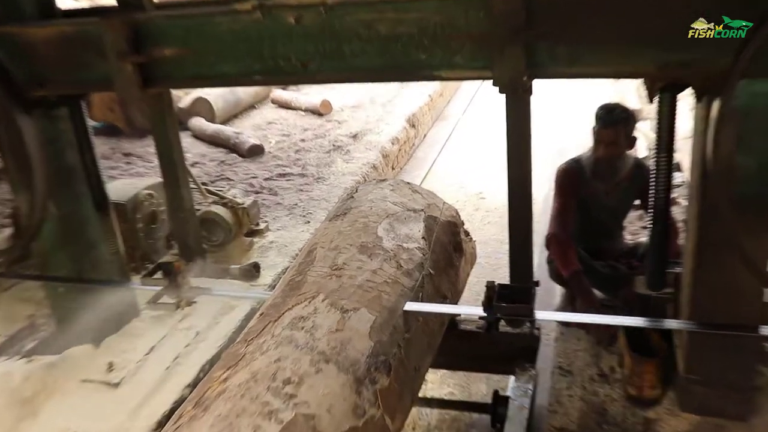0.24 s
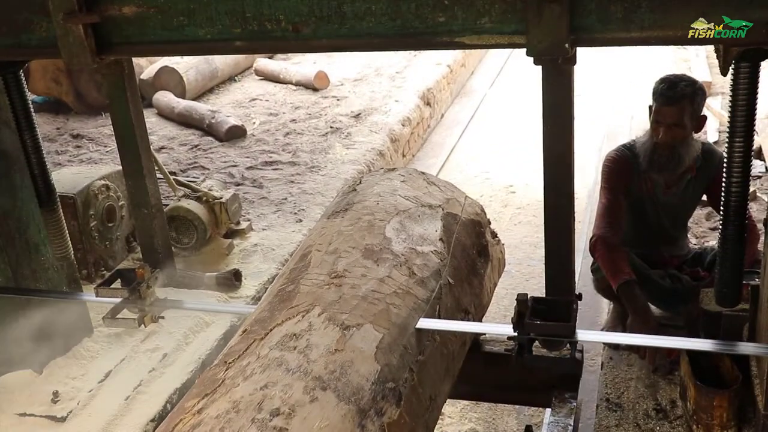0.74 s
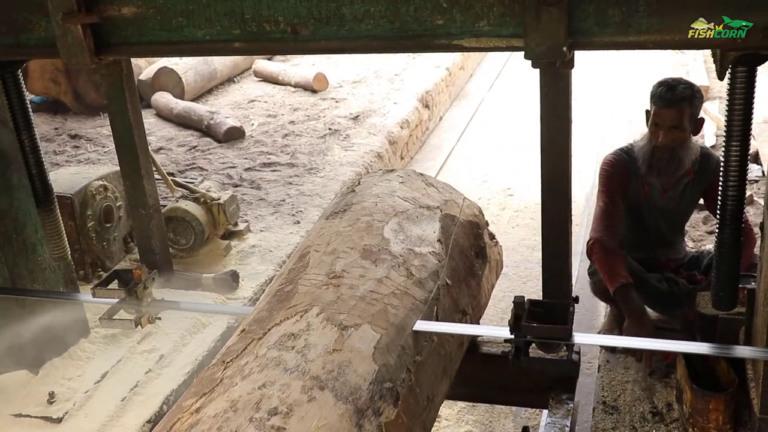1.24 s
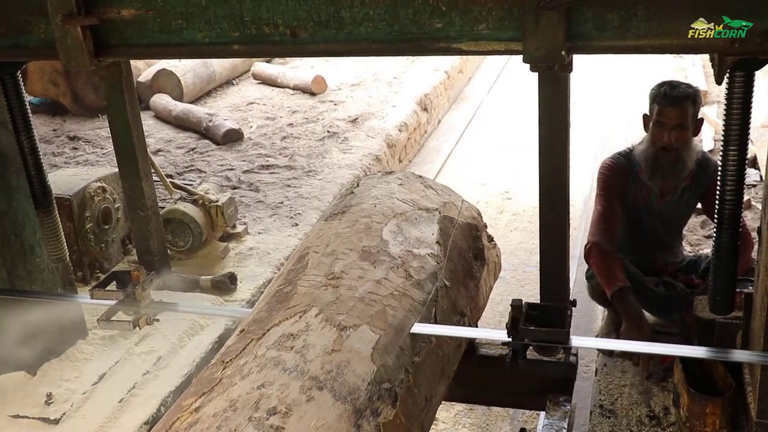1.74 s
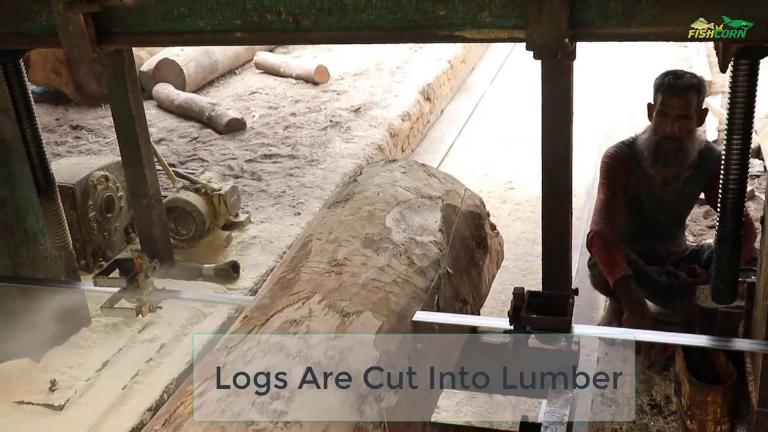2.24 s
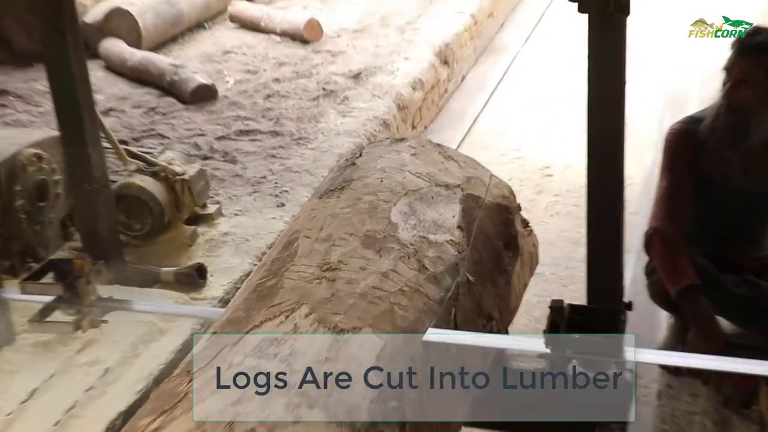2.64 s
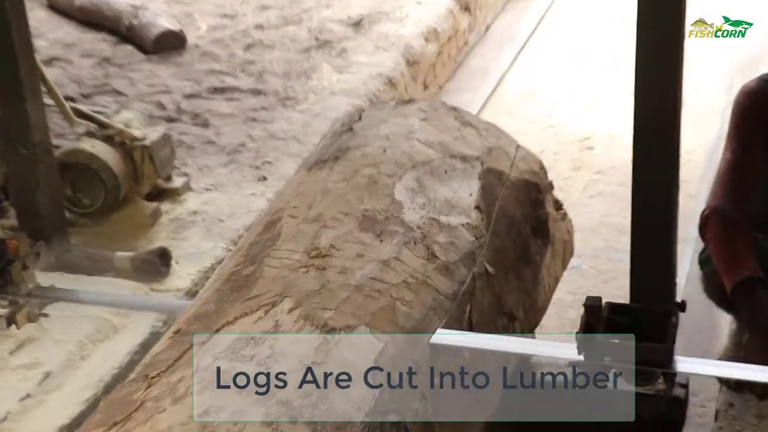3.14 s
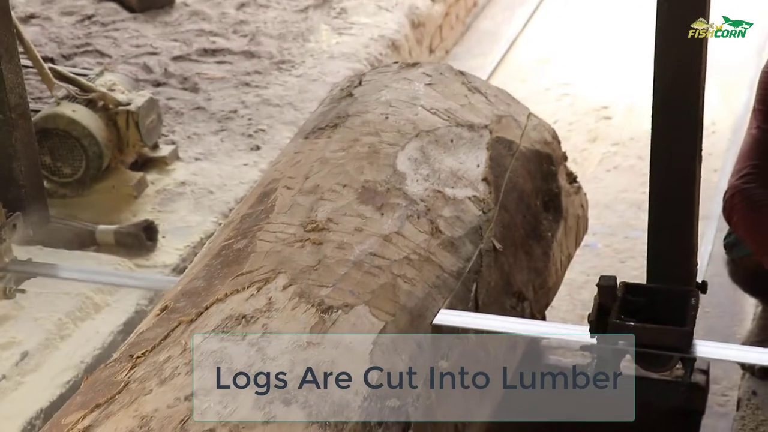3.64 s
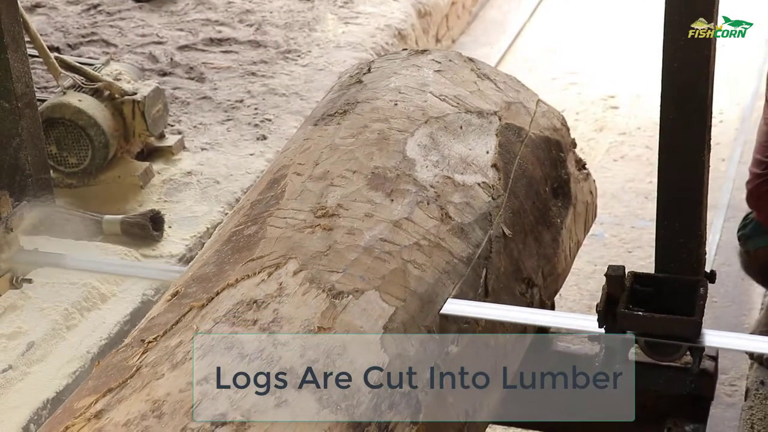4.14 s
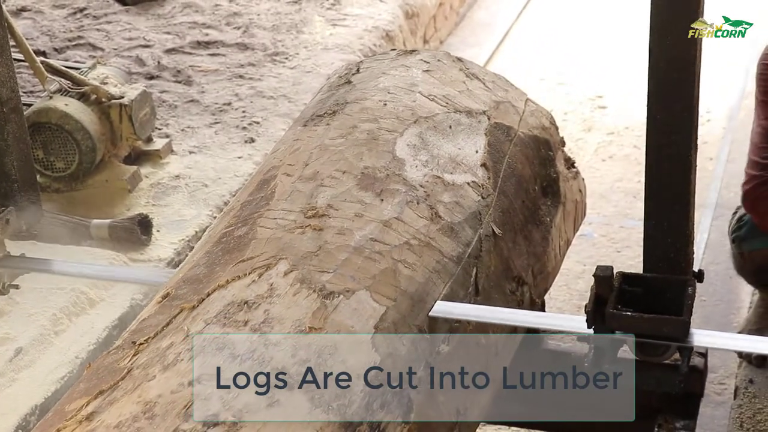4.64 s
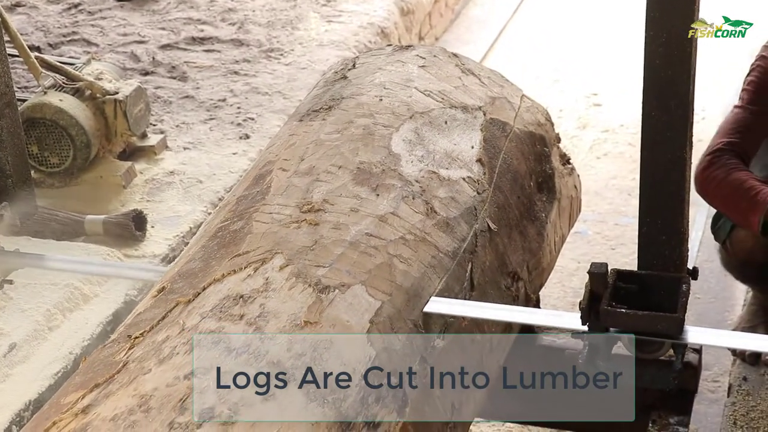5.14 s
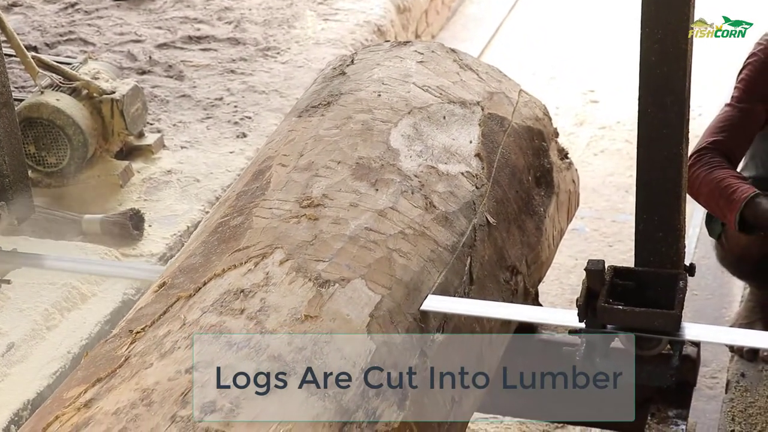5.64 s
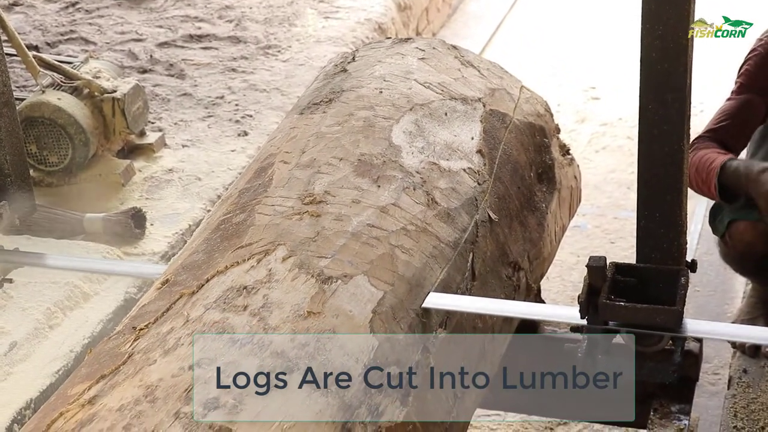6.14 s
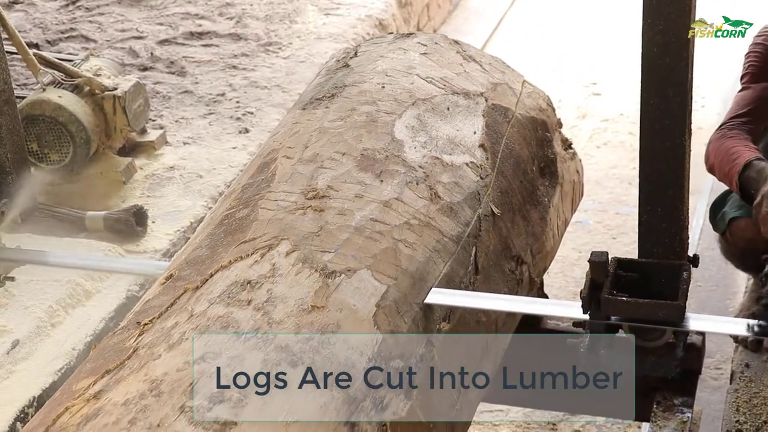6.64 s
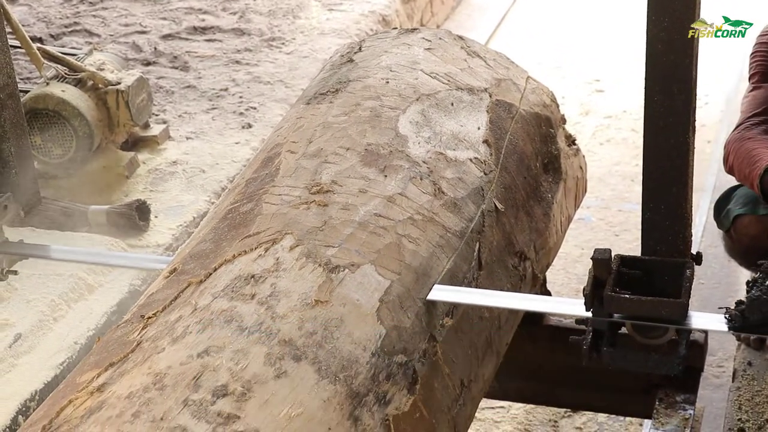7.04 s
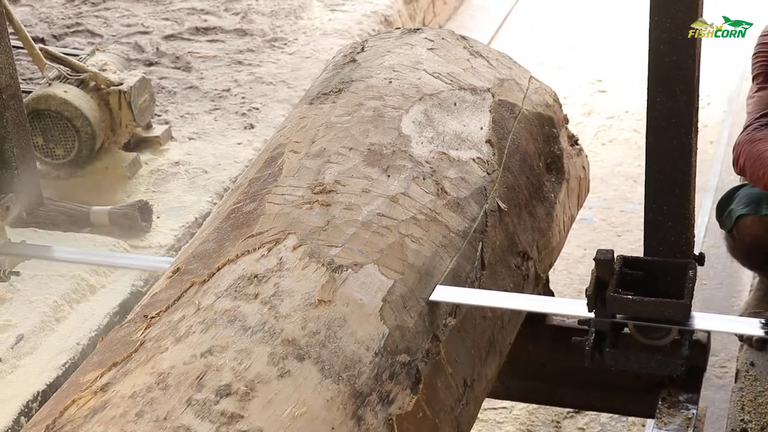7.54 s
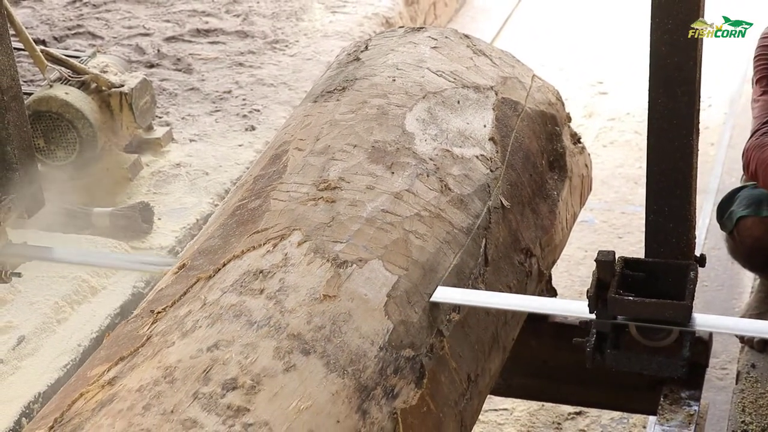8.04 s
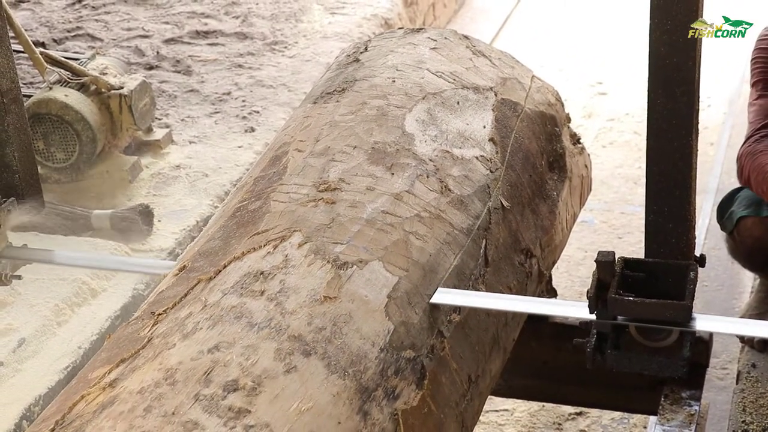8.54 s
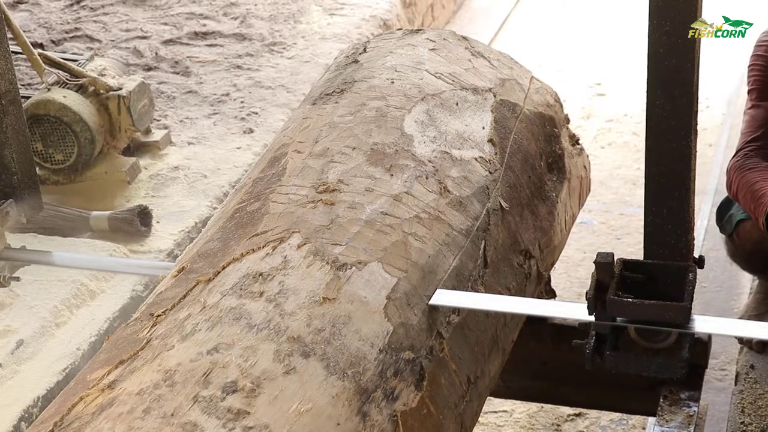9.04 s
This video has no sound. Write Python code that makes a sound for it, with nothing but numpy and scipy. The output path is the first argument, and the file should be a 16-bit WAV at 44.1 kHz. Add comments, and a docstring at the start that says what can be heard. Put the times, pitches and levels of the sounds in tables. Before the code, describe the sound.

Close to a large band saw in an open sawmill shed, the teeth rip through a thick log with a constant, bright, gritty hiss. It surges and flutters rapidly, with fine dust fizz, splinter ticks and brief high chirps from the pinched band. Far quieter underneath are log rumble, frame judder, a few soft thuds, motor hum and faint machine moans. The cut never stops.

```python
"""An open sawmill shed, where a horizontal band saw cuts steadily through a big log.
The teeth tear the fibres with a surging hiss of stroked noise, and splinters and dust spray as snaps and fizz.
The steel band rubs in the kerf, rings through narrow resonances and squeals in short falling chirps.
Underneath, filtered noise makes the log and carriage rumble and knock, and the frame judder.
A motor hums and other machines moan faintly, as wavering sines over a low wash of mill noise."""
import sys
import numpy as np
from scipy import signal
from scipy.fft import rfft, irfft
from scipy.io import wavfile

SR = 44100
rng = np.random.default_rng(int(sys.argv[2]) if len(sys.argv) > 2 else 0)


def unload_wav(signal):
    """Save mono or channel-first audio to the path in sys.argv[1] as 16-bit WAV at rate SR, clipped to [-1, 1]."""
    wavfile.write(
        sys.argv[1],
        SR,
        np.round(np.clip(np.atleast_2d(signal).T, -1, 1) * 32767).astype(np.int16),
    )


N = 410130
TIME = np.arange(N) / SR
HZ = np.fft.rfftfreq(N, 1 / SR)
LAP_S = .7604  # one lap of the band loop
USUAL_BITE_DB, USUAL_SHAKE_DB = -35, -57.5  # reference levels for a harder or lighter cut
EDGE_HZ = 15700  # upper limit of the whole sound

# Levels below are relative: each layer adds its own trim and unsteadiness.
# how hard the feed presses the teeth into the log, joined by lines: start_s, level_db
FEED_BITE = [(0.0, -34), (1.02, -35.5), (1.58, -36), (2.28, -35.5), (3.12, -36.9), (3.67, -36.5),
             (3.77, -34.1), (4.34, -34), (4.64, -36.5), (5.35, -32.9), (5.49, -34.5), (6.03, -36),
             (6.82, -33.5), (6.9, -38), (7.44, -36.5), (7.66, -33.5), (8.23, -36.5), (9.3, -37.1)]
# soft and hard spots in the wood: centre_s, half_length_s, bite_change_db
WOOD_SPOTS = [(.57, 0.033, -3), (.8, .045, 2), (1.34, 0.029, -3), (1.42, 0.016, 1), (1.8, .017, 3),
              (2.51, .02, -2), (2.67, .018, -2), (3.29, 0.011, -2.5), (4.8, .03, -2.9), (5.77, 0.032, 1.5),
              (6.2, 0.021, 3), (6.28, 0.058, -4.5), (6.56, .012, 2.5), (7.02, .015, 2), (7.14, 0.018, 1),
              (7.3, .03, 1), (9.22, .016, 2)]
# keen stretches of teeth, back on every lap of the band: centre_in_lap_s, half_length_s, extra_bite_db
KEEN_TEETH = [(0.079, 0.029, 3), (0.131, 0.009, 2.3), (0.197, 0.02, 2.2), (0.295, 0.036, 1.6),
              (0.448, 0.048, 2.5), (0.576, 0.016, 2), (0.656, 0.014, 3.5), (0.719, 0.038, 2.5)]
# how much the keen stretches stand out, joined by lines: start_s, share
KEEN_SHARE = [(0, 0.37), (1.5, 0.99), (6.8, 0.53), (7.6, 0.19)]
# the band binds in the kerf, rubbing and shaking the machine: start_s, rub_db, log_db, frame_db
BINDING = [(0.0, -38.2, -54, -54), (0.69, -40.5, -58.5, -54.0), (1.03, -40.5, -60.5, -60),
           (1.83, -39.5, -59.5, -61), (2.11, -41, -59, -58), (2.86, -38.0, -58, -54.5),
           (3.51, -38, -54, -52), (4.19, -41, -57.5, -59.7), (4.63, -40.5, -60.5, -66),
           (4.81, -41, -54, -54), (5.19, -38.5, -59.5, -57.5), (5.65, -43.8, -59.5, -65.5),
           (6.49, -38.9, -59, -61), (6.96, -42.5, -62.5, -63.5), (7.37, -38, -55, -56.0),
           (8.03, -38, -57.5, -56.9), (8.67, -37.1, -52.5, -51), (9.3, -37.5, -53, -51.5)]
# the kerf grabs the band for a moment: centre_s, half_length_s, extra_rub_db, extra_shake_db
KERF_GRABS = [(0.404, 0.021, 2.5, 1.5), (2.27, .06, 1.5, 1.5), (3.505, .04, 1, 4.5), (3.783, .04, 3, 3),
              (4.876, .03, 2, 0.5), (5.025, .03, 3, 0.5), (6.338, 0.031, 0, -1), (7.22, 0.051, 1.5, 2),
              (7.58, 0.032, 1, 3.5), (8.32, 0.036, -0.5, 3), (8.686, .03, 1, 4), (9.14, 0.029, 2, 1.5)]
# spectrum of the torn fibres: point_hz, density_db (per Hz)
TEAR_COLOUR = [(1900, -52), (2500, -8), (3700, -3), (4900, 1), (5250, 1.5), (5550, -2), (6300, 0),
               (7300, 1), (9000, 0.5), (10200, -2.5), (11200, -7.5), (12500, -5.5), (13700, -13),
               (16000, -19)]
# broad ringing of the teeth: pitch_hz, width_hz, level_db
TOOTH_MODES = [(6425, 290, -3), (6585, 350, -2), (6800, 280, -12.5)]
# spectrum of the band rubbing in the kerf: point_hz, density_db (per Hz)
RUB_COLOUR = [(1000, -52), (2000, -26), (2200, -19.5), (2380, 2.5), (2700, 0.5), (3100, -2), (3900, -0.5),
              (4900, -3.5), (5600, -14.5), (7000, -5.5), (10000, -28.5), (16000, -23)]
# clouds of fine dust blown out of the kerf: centre_s, half_length_s, extra_fizz_db
DUST_CLOUDS = [(.35, .1, 2), (4.2, 0.44, 2), (7.6, .1, 9), (7.98, 0.16, 10)]
# spectrum of the dust fizz: point_hz, density_db (per Hz)
SPRAY_COLOUR = [(6000, -19), (9500, -7), (12000, 0), (14000, -2), (16000, -4)]
# narrow modes of the steel band: pitch_hz, width_hz, level_db
BAND_MODES = [(2490, 48, 1), (3120, 14, -18), (3600, 18, -14), (4395, 28, 2), (4823, 49, 5),
              (4980, 30, 6.5), (5170, 44, 5), (6450, 39, -5), (9200, 55, -7)]
# spectrum of the log's rumble: point_hz, density_db (per Hz)
LOG_COLOUR = [(150, -39), (250, -12.5), (400, -13), (460, -6), (520, -10), (600, -0.5), (700, -1), (850, 6),
              (950, 0.5), (1050, -11), (1400, -15), (2500, -37)]
# narrow resonances of the log on its carriage: pitch_hz, width_hz, level_db
LOG_MODES = [(303.7, 8, -11.5), (452, 6.6, -4.5), (487, 9.3, -10), (556.3, 7, -2.5), (590.4, 36, -1.5),
             (855, 26, -0.5), (921.5, 16, -1)]
# spectrum of the juddering steel frame: point_hz, density_db (per Hz)
FRAME_COLOUR = [(1100, -27), (1420, -15), (1570, -1.5), (1720, 0.5), (1880, -1), (2030, -10.5), (2400, 0.5),
                (3500, -51)]
# narrow resonances of the steel frame: pitch_hz, width_hz, level_db
FRAME_MODES = [(1564, 40, -3.5), (1604, 25, -3), (1867, 12, -1.5)]
# spectrum of the mill wash in the shed: point_hz, density_db (per Hz)
SHED_COLOUR = [(20, -40), (45, -31), (80, -18), (110, -8), (150, -12), (240, -1.5), (450, 2), (800, -5.5),
               (1200, -0.5), (3000, -19)]
# faint sagging moans of machines across the shed: start_s, length_s, starting_pitch_hz, level_db
MOANS = [(0, 0.55, 788, -62.5), (0.496, 0.63, 466, -73.5), (2.447, 0.47, 464, -69.5),
         (3.295, 0.89, 310, -69.5), (4.248, 0.62, 374, -73), (4.543, 0.42, 608, -68),
         (5.404, 0.82, 371, -73), (5.802, 0.68, 606, -68), (6.886, 0.59, 584, -65), (6.99, 0.66, 470, -70),
         (8.098, 0.43, 924, -57.5), (8.108, 0.54, 464, -68), (8.75, 0.67, 310, -69)]
# dull knocks of the log on its carriage: full_level_s, level_db, pitch_factor, decay_s
KNOCKS = [(.71, -64, .8, 0.039), (2.6, -61, 1.14, 0.13), (3.15, -52.5, 1.24, 0.11),
          (3.25, -47, 1.02, 0.047), (3.75, -61, .85, 0.066), (5.22, -61, .95, 0.047),
          (7.39, -62, 0.83, 0.058), (7.91, -57, 1.23, 0.044), (8.64, -56, 1.5, 0.053),
          (8.74, -53, 1.17, 0.043), (8.91, -61.5, 1.18, 0.025), (9.22, -60, 0.84, 0.055)]
# spectrum of a knock before its pitch factor: point_hz, density_db (per Hz)
KNOCK_COLOUR = [(150, -31), (300, -17), (430, -6), (530, 3), (700, -8.5), (900, -16), (1300, -15),
                (2500, -46)]
# brief squeals of a pinched band: centre_s, pitch_hz (at the centre), level_db
SQUEALS = [(0.9, 6410, -37), (1.96, 6380, -37), (3.9, 6520, -37), (4.25, 6360, -38), (4.37, 6370, -38),
           (5.22, 6370, -39), (5.29, 6650, -35), (5.39, 6340, -36), (5.76, 6360, -38), (5.9, 6550, -36),
           (6.05, 6350, -39), (6.55, 6310, -37), (6.66, 6570, -38), (6.81, 6330, -36)]


def amp(db):
    """Decibels to gain."""
    return 10 ** (np.asarray(db) / 20)


def unit(x):
    """Scales to an rms of one."""
    return x / np.sqrt(np.mean(x ** 2) + 1e-20)


def curve(rows, column=1):
    """One column of a table, joined by straight lines in time."""
    rows = np.array(rows)
    return np.interp(TIME, rows[:, 0], rows[:, column])


def swells(rows, clock=TIME):
    """Smooth rises or dips in dB, one bell shape for each row."""
    out = np.zeros(N)
    for centre, half, db in rows:
        near = abs(clock - centre) < 4 * half
        out[near] += db * np.exp(-.5 * ((clock[near] - centre) / half) ** 2)
    return out


def noise():
    """White noise."""
    return rng.standard_normal(N)


def wander(low_hz, high_hz, step=32):
    """Random unsteadiness between two rates, the slower ones stronger, drawn every few samples."""
    clock = TIME[::step]
    hz = np.fft.rfftfreq(len(clock), step / SR)
    low_cut = (hz / low_hz) ** 2 / (1 + (hz / low_hz) ** 2)
    shape = low_cut / (1 + (hz / high_hz) ** 4) / np.sqrt(hz + 1)
    spectrum = rfft(rng.standard_normal(len(clock))) * shape
    return np.interp(TIME, clock, unit(irfft(spectrum, len(clock))))


def fading(hits, decay_s):
    """Each hit jumps up at once and dies away exponentially."""
    return signal.lfilter([1], [1, -np.exp(-1 / (decay_s * SR))], hits)


def colour(x, points, pitch=1):
    """Gives x a spectrum, optionally shifted in pitch, that falls away below its lowest point."""
    hz, db = np.transpose(points)
    skirt = np.minimum(HZ / (hz[0] * pitch), 1) ** 2
    gain = amp(np.interp(np.log(HZ + 1), np.log(hz * pitch), db))
    return unit(irfft(rfft(x) * skirt * gain, N))


def ring(x, modes):
    """Passes x through resonances, each carrying its own share of the power."""
    response = sum(amp(db) / np.sqrt(width) / (1 + 1j * (HZ - hz) / width) ** 2 for hz, width, db in modes)
    return unit(irfft(rfft(x) * response, N))


def effort(uneven_db=0.24, rub_share=.25):
    """Levels in dB of biting and rubbing: the feed, spots in the wood, the laps of the band and its grabs."""
    spots = swells(WOOD_SPOTS)
    lap_clock = TIME % LAP_S
    # the second reading carries a swell over from the end of one lap into the next
    laps = swells(KEEN_TEETH, lap_clock) + swells(KEEN_TEETH, lap_clock + LAP_S)
    bite_db = curve(FEED_BITE) + spots + curve(KEEN_SHARE) * laps + uneven_db * wander(10, 35)
    grabs = swells((s, half, rub_db) for s, half, rub_db, _ in KERF_GRABS)
    return bite_db, curve(BINDING) + rub_share * spots + grabs


def tooth_strokes(tooth_hz=238, slip=0.032, depth=0.27, stroke=0.2, uneven_db=4):
    """Each tooth takes a bite of its own size that dies away before the next; stroke is in tooth periods."""
    turns = np.cumsum(tooth_hz * (1 + slip * wander(2.3, 60))) / SR
    tooth_sizes = amp(uneven_db * np.clip(noise(), -2, 2))
    size = tooth_sizes[turns.astype(int) % N]
    return unit(1 + depth * size * np.exp(-(turns % 1) / stroke))


def band_flutter(wheel_hz=24.7, wheel_db=0.57, snag_db=0.76, snags_per_s=45, release_s=0.0093):
    """The band trembles with the drive pulley; it snags at once and lets go gradually."""
    catches = rng.uniform(0.37, 1, N) * (rng.random(N) < snags_per_s / SR)
    snags = fading(catches, release_s)
    tremble = np.sin(2 * np.pi * (wheel_hz * TIME + rng.random()))
    return amp(snag_db * unit(snags - snags.mean()) + wheel_db * tremble)


def grain(x, bite_db, edge_hz=7800, flicker_db=1.06, brighten=0.22):
    """Hard and soft grain pass the teeth in turn; the harder the bite, the brighter the hiss."""
    bright = irfft(rfft(x) / (1 + (edge_hz / (HZ + 1)) ** 8), N)
    treble_db = brighten * (bite_db - USUAL_BITE_DB) + flicker_db * wander(5, 30)
    return x + bright * (amp(treble_db) - 1)


def cutting(bite_db, rub_db, tear_db=-0.98, teeth_db=-5.5, kerf_db=1.75, scrape_db=0.81, ring_db=0.4):
    """Teeth tear the fibres and ring, while the side of the band rubs in the kerf."""
    strokes = tooth_strokes()
    bite = amp(bite_db) * band_flutter()
    tearing = amp(tear_db) * bite * grain(colour(strokes * noise(), TEAR_COLOUR), bite_db)
    teeth = amp(teeth_db + ring_db * wander(1.4, 8)) * bite * ring(strokes * noise(), TOOTH_MODES)
    rubbing = amp(kerf_db + rub_db + scrape_db * wander(2.2, 40)) * colour(noise(), RUB_COLOUR)
    return tearing + teeth + rubbing


def sawdust(bite_db, per_s=500, spread_db=4, decay_s=0.00031, level_db=-13):
    """Splinters snap and chips tick against the frame, more loudly under a hard bite."""
    size = amp(spread_db * np.minimum(rng.exponential(1, N), 4))
    hits = size * (rng.random(N) < per_s / SR)
    snaps = fading(hits, decay_s) * noise()
    return amp(level_db + bite_db) * colour(snaps, TEAR_COLOUR)


def spray(bite_db, level_db=-52, growth=1.7, puff_db=2.0, puffs_per_s=22, settle_s=0.033):
    """Dust leaves the kerf in sudden puffs that settle, with a thin high fizz that grows faster than the bite."""
    bursts = rng.uniform(.4, 1, N) * (rng.random(N) < puffs_per_s / SR)
    puffs = fading(bursts, settle_s)
    fizz_db = level_db + growth * (bite_db - USUAL_BITE_DB) + swells(DUST_CLOUDS)
    return amp(fizz_db + puff_db * unit(puffs - puffs.mean())) * colour(noise(), SPRAY_COLOUR)


def singing(bite_db, rub_db, level_db=-11):
    """Biting and rubbing both excite the narrow modes of the steel band."""
    return amp(level_db + (bite_db + rub_db) / 2) * ring(noise(), BAND_MODES)


def machine(log_db=-3.5, log_modes_db=-10.5, frame_db=-2.14, frame_modes_db=-9,
            log_judder_db=1.5, frame_judder_db=1.5):
    """The log and the steel frame judder with the cut, each with its own resonances."""
    log = amp(log_db) * colour(noise(), LOG_COLOUR) + amp(log_modes_db) * ring(noise(), LOG_MODES)
    frame = amp(frame_db) * colour(noise(), FRAME_COLOUR) + amp(frame_modes_db) * ring(noise(), FRAME_MODES)
    log = log * amp(curve(BINDING, column=2) + log_judder_db * wander(3.4, 11.3))
    frame = frame * amp(curve(BINDING, column=3) + frame_judder_db * wander(2.5, 12))
    grab_db = swells((s, half, shake_db) for s, half, _, shake_db in KERF_GRABS)
    return amp(grab_db) * (log + frame)


def frame_load():
    """How far, in dB, the binding band shakes the frame above its usual level."""
    return curve(BINDING, column=3) - USUAL_SHAKE_DB


def shed(wash_db=-68, swell_db=1.3, follow=0.13):
    """A low, restless wash of mill noise that rises a little as the frame shakes."""
    level_db = wash_db + follow * frame_load() + swell_db * wander(0.88, 8.8)
    return amp(level_db) * colour(noise(), SHED_COLOUR)


def motor(hum_hz=113, sag_hz_per_db=1.1, hum_db=-88.0, strain=0.16, fade_db=1.8, waver=0.028):
    """A faint hum that sags in pitch and grows as the band binds and shakes the frame."""
    load_db = frame_load()
    pitch_hz = (hum_hz - sag_hz_per_db * load_db) * (1 + waver * wander(3.3, 15))
    turns = np.cumsum(pitch_hz) / SR
    return amp(hum_db + strain * load_db + fade_db * wander(3, 15)) * unit(np.sin(2 * np.pi * turns))


def moans(sag=0.0338, waver=0.0035, shimmer_db=2.5):
    """Faint tones that swell, fade and sag in pitch, as of distant machines taking load."""
    out = np.zeros(N)
    drift = 1 + waver * wander(8.6, 40)
    shimmer = amp(shimmer_db * wander(5.2, 16))
    for start, length, hz, db in MOANS:
        near = (TIME >= start) & (TIME < start + length)
        along = (TIME[near] - start) / length
        turns = np.cumsum(hz * (1 - sag * along) * drift[near]) / SR
        out[near] += amp(db) * np.sqrt(2) * np.sin(np.pi * along) * np.sin(2 * np.pi * turns)
    return out * shimmer


def knocks(rise_s=0.03):
    """Soft-edged thuds, blurred by the shed: each rises, holds for as long again and dies away."""
    out = np.zeros(N)
    for full_s, db, pitch, decay in KNOCKS:
        age = np.maximum(TIME - full_s + rise_s, 0)
        attack = np.minimum(age / rise_s, 1)
        decline = np.exp(-np.maximum(age - 2 * rise_s, 0) / decay)
        out += amp(db) * attack * decline * colour(noise(), KNOCK_COLOUR, pitch)
    return out


def squeals(length_s=.016, fall_per_s=0.493, rough=0.011, level_db=1.0):
    """The kerf pinches the band, which chirps and drops in pitch as it slips free."""
    out = np.zeros(N)
    jitter = rough * wander(25, 200)
    for centre, hz, db in SQUEALS:
        near = abs(TIME - centre) < 4 * length_s
        age = TIME[near] - centre
        turns = np.cumsum(hz * (1 - fall_per_s * age + jitter[near])) / SR
        envelope = np.exp(-.5 * (age / length_s) ** 2)
        out[near] += amp(db + level_db) * np.sqrt(2) * envelope * np.sin(2 * np.pi * turns)
    return out


def reflections(x, share, spread_s, shift_hz, count=30, groups=5):
    """Frame, log and floor throw back early echoes, whose mix shifts as the noisy spot moves along the band."""
    out = x.copy()
    weights = np.array([wander(shift_hz / 2, shift_hz) for _ in range(groups)])
    for weight in weights / np.linalg.norm(weights, axis=0):
        delays = .001 + np.minimum(rng.exponential(spread_s, count), .08)
        taps = np.zeros(SR // 10)
        taps[(delays * SR).astype(int)] = rng.choice([-1, 1], count) / np.sqrt(count)
        out += share * signal.oaconvolve(x * weight, taps)[:N]
    return out / np.sqrt(1 + share ** 2)


def scene():
    """The saw is close; the shaking machine is heard more by way of its surroundings."""
    bite_db, rub_db = effort()
    saw = cutting(bite_db, rub_db) + sawdust(bite_db) + spray(bite_db)
    saw = reflections(saw, share=0.39, spread_s=.01, shift_hz=2.47)
    body = reflections(machine() + shed(), share=0.62, spread_s=.007, shift_hz=3.95)
    mono = saw + singing(bite_db, rub_db) + body + motor() + moans() + knocks() + squeals()
    return np.array([mono, mono])


def record(dry):
    """A steep low-pass filter sets the upper limit of the whole sound."""
    low_pass = signal.firwin(1023, EDGE_HZ, window=("kaiser", 9), fs=SR)
    return signal.oaconvolve(dry, low_pass[None], "same")


dry = scene()
out = record(dry)
unload_wav(out)
```